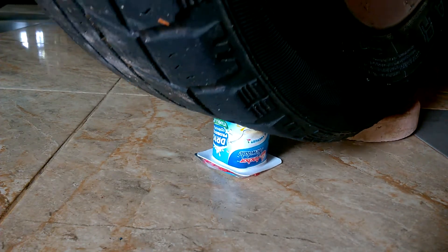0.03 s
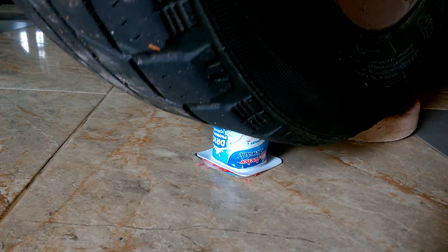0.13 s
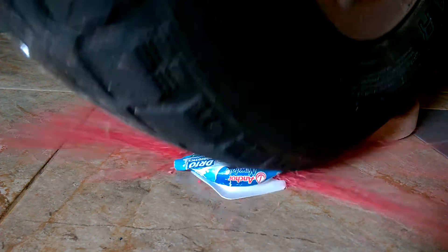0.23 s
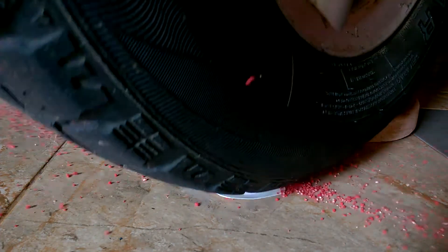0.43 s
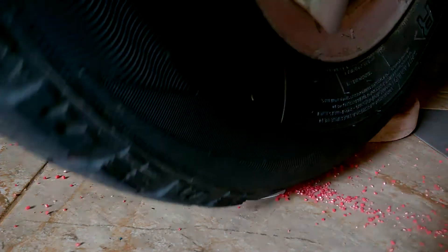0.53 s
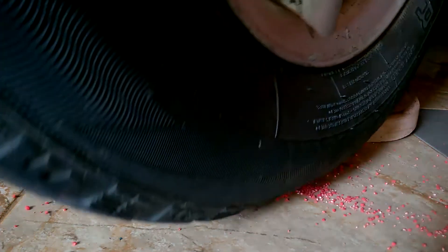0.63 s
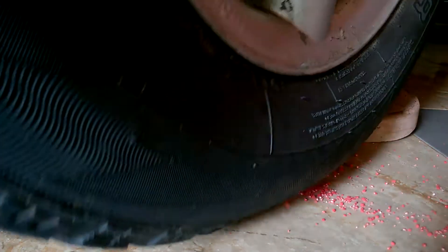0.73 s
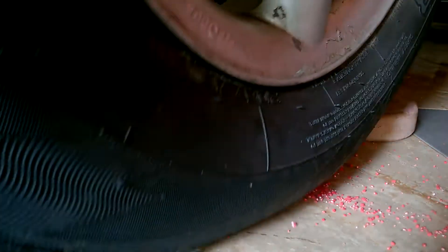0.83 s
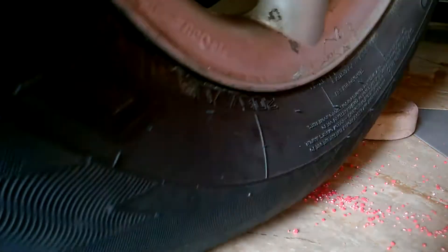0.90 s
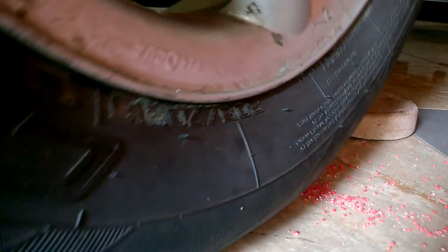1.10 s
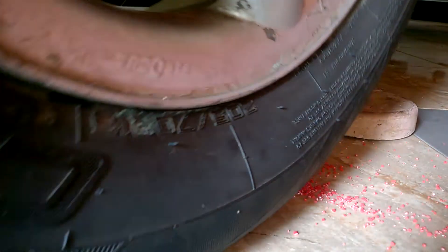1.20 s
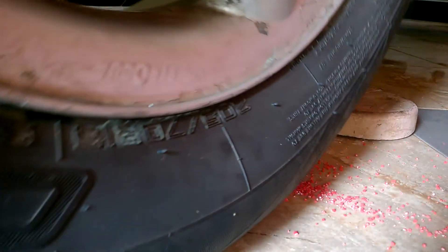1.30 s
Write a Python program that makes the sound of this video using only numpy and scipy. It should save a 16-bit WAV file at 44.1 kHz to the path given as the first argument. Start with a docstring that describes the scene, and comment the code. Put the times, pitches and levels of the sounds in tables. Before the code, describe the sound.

Close up in a hard tiled room, a slowly rolling tyre bursts a sealed cup with a sudden boomy pop, followed by brittle plastic crackling, brief rubber squeaks, a late hollow knock and sparse ticks over low rumble.

```python
"""A sealed plastic cup bursts on a tiled floor in a hard room under a slowly rolling car tyre.
The pop is struck modes with a booming noise tail, and the flattened plastic snaps through resonances
and buckles in low tones with room echoes. The tyre hums, rumbles and squeaks in tones and narrow noise,
granules hiss over the tiles as random clicks, and a late knock rattles and sets some metal ringing."""
import sys
import numpy as np
from scipy import signal
from scipy.fft import rfft, irfft
from scipy.io import wavfile
from scipy.ndimage import uniform_filter1d

SR = 44100
rng = np.random.default_rng(int(sys.argv[2]) if len(sys.argv) > 2 else 0)


def generate_wav(sig):
    """Save sig (samples, or channels by samples) to the path in sys.argv[1] as 16-bit PCM at SR."""
    pcm = np.round(np.clip(np.atleast_2d(sig).T, -1, 1) * 32767).astype(np.int16)
    wavfile.write(sys.argv[1], SR, pcm)


N = 59535
T = np.arange(N) / SR  # s
POP_S = 0.2052  # moment the cup bursts

# bright colour of granules on tile, also of the snaps' ticks: f/Hz, relative level/dB
HISS_COLOUR = [(5500, -10), (7000, -1), (9500, -2), (11800, 0), (14000, -3), (15700, -6), (16200, -12)]


def amp(db):
    """Decibels to amplitude."""
    return 10 ** (np.asarray(db) / 20)


def level(curve):
    """Amplitude over the whole scene from breakpoints of t/s, level/dB."""
    return amp(np.interp(T, *np.transpose(curve)))


def evened(x):
    """Scales x to rms 1."""
    return x / np.sqrt(np.mean(x ** 2) + 1e-20)


def read(points, hz):
    """Reads a curve over frequency, interpolating along log frequency."""
    f, value = np.transpose(points)
    return np.interp(np.log(hz + 1), np.log(f + 1), value)


def coloured(x, colour):
    """Filters x to a spectrum, silent outside its end points, at rms 1."""
    hz = np.fft.rfftfreq(len(x), 1 / SR)
    inside = (hz >= colour[0][0]) & (hz <= colour[-1][0])
    spectrum = rfft(x) * amp(read(colour, hz)) * inside
    return evened(irfft(spectrum, len(x)))


def add(mix, s, sound):
    """Mixes a sound in at s seconds, cut at the end of the scene."""
    part = mix[round(s * SR):][:len(sound)]
    part += sound[:len(part)]


def resonate(x, hz, width):
    """A resonance of gain 1 that may glide: shift hz down to zero, smooth, shift back."""
    turn = np.exp(2j * np.pi * np.cumsum(hz * np.ones(len(x))) / SR)
    r = np.exp(-np.pi * width / SR)
    smooth = signal.lfilter([1 - r], [1, -r], x / turn)
    return 2 * (turn * smooth).real


def puff(noise, hz, width):
    """A burst through a steep double resonance, peak 1."""
    out = resonate(resonate(noise, hz, width), hz, width)
    return out / abs(out).max()


def ring(modes, t):
    """Dying sines struck at t = 0."""
    return sum(amp(db - 60 * t / t60) * np.sin(2 * np.pi * hz * t) for hz, db, t60 in modes)


def grains(per_s, spread_db):
    """Random clicks, a few of them large when spread_db is above 0."""
    clicks = rng.standard_normal(N) * (rng.random(N) < per_s / SR)
    return clicks * amp(spread_db * np.minimum(rng.exponential(1, N), 5))


def wavering_tone(hz, width, share):
    """A steady sine plus a share of narrow resonant noise that makes it waver, at rms 1."""
    waver = evened(resonate(rng.standard_normal(N), hz, width))
    return evened(np.sin(2 * np.pi * hz * T) + share * waver)


def tyre():
    """Low hum and rumble of the loaded tyre, thin rubber squeaks, and wavering rings after the pop."""
    # rolling rumble: t/s, level/dB
    rumble = [(0.0, -44.5), (0.164, -53), (0.206, -47), (0.304, -30), (0.45, -41), (0.68, -44.5),
              (1.35, -48.5)]
    # colour of the rumble: f/Hz, relative level/dB
    rumble_colour = [(18, 3.5), (26, 0.5), (33, -8), (45, -11), (97, -5.5), (160, -20.5)]
    # swells of the hum: t/s, level/dB
    hum = [(0.0, -50), (0.18, -56), (0.228, -37), (0.308, -33), (0.556, -44.5), (0.642, -33), (0.8, -38),
           (1.12, -42.5), (1.16, -52.5), (1.35, -49)]
    # rings after the pop: f/Hz, width/Hz, level/dB, t60/s, waver against the steady tone/ratio
    tyre_rings = [(225.1, 11.4, -30.5, 1.768, 0.136), (446, 10.9, -29, 0.82, 0.93)]
    # rubber squeaks: start/s, end/s, first f/Hz, last f/Hz, level/dB, roughness/0-1
    squeaks = [(0.013, 0.204, 3746, 3109, -57, 0.02), (0.175, 0.199, 2171, 2150, -50.5, 0),
               (0.536, 0.543, 1888, 1985, -24.5, 0.22), (0.548, 0.57, 1954, 1894, -38.5, 0.53),
               (0.627, 0.76, 4220, 4048, -44, 0.8), (0.757, 0.816, 2465, 2530, -48, 0.22)]

    out = level(rumble) * coloured(rng.standard_normal(N), rumble_colour)
    out += level(hum) * wavering_tone(62, width=5.36, share=0.356)
    for start, end, first_hz, last_hz, db, rough in squeaks:
        hz = np.linspace(first_hz, last_hz, round((end - start) * SR))
        whistle = np.sin(2 * np.pi * np.cumsum(hz) / SR)
        fuzz = evened(puff(rng.standard_normal(len(hz)), hz, width=170))
        tone = (1 - rough) * whistle + rough * fuzz
        add(out, start, amp(db) * signal.windows.tukey(len(hz), 0.3) * tone)
    for hz, width, db, t60, share in tyre_rings:
        add(out, POP_S, amp(db - 60 * T / t60) * wavering_tone(hz, width, share))
    return out


def scatter():
    """Dense small cracks of plastic, and granules skittering on tile, as coloured random clicks."""
    # small cracks: t/s, level/dB
    crackle = [(0.0, -57), (0.258, -67), (0.382, -35), (0.634, -43), (0.766, -46), (0.966, -51),
               (1.222, -48.5), (1.35, -55.5)]
    # colour of the cracks: f/Hz, relative level/dB
    crackle_colour = [(180, -12), (300, 11), (453, -6), (586, 1), (725, 4), (2080, 2), (2680, -0.5),
                      (4110, 2), (5320, -1), (9000, -25.5), (11700, -67), (19800, -120)]
    # granules on tile: t/s, level/dB
    hiss = [(0, -70), (.203, -80.5), (.207, -48), (.235, -40.5), (.3, -50), (.34, -59), (.43, -47),
            (.55, -55.5), (.6, -63.5), (.65, -65.5), (.68, -53), (.76, -62.5), (.79, -87), (1.35, -72.5)]

    cracks = coloured(grains(per_s=6000, spread_db=2.55), crackle_colour)
    granules = coloured(grains(per_s=15000, spread_db=2.94), HISS_COLOUR)
    return level(crackle) * cracks + level(hiss) * granules


def floor_noise():
    """Steady background noise under everything."""
    # colour of the background: f/Hz, relative level/dB
    floor_colour = [(71, -30.5), (120, 8), (200, 4.5), (314, -11.5), (362, -3.5), (805, -10), (1580, -26.5),
                    (2990, -14), (3450, -11.5), (3820, -24), (5410, -29), (16000, -61)]
    return amp(-49.5) * coloured(rng.standard_normal(N), floor_colour)


def snaps():
    """Each snap is a crack and some grit through two resonances, plus a treble tick on its own track."""
    # sharp snaps of plastic: t/s, main peak level/dB, f/Hz, upper ring level/dB, tick level/dB
    snap_table = [(0.0084, -48.5, 3790, -39.5, -69.5), (0.064, -41, 3620, -49.5, -90),
                  (0.0874, -58.5, 3240, -39, -66), (0.2864, -20, 3640, -38.5, -39.5),
                  (0.2974, -21.5, 3930, -38.5, -55), (0.3406, -27, 4000, -22.5, -52.5),
                  (0.3777, -20, 4050, -29, -49), (0.398, -19, 3650, -20.5, -68.5),
                  (0.4157, -23.5, 3960, -30, -63), (0.4246, -12.5, 4217, -23, -51.5),
                  (0.4299, -17, 4350, -45.5, -65.5), (0.4427, -13.5, 4190, -24.5, -58.5),
                  (.4465, -22.5, 3090, -21, -59.5), (0.455, -19.5, 3600, -23.5, -66),
                  (0.4645, -19.5, 3160, -26.5, -66), (0.4709, -20, 3880, -44, -60.5),
                  (0.4779, -22, 3110, -27, -65), (0.492, -23.5, 3560, -32, -69),
                  (0.502, -34.5, 4000, -26.5, -51.5), (0.5196, -28, 4000, -32, -58.5),
                  (0.5448, -27.5, 3930, -67, -54), (0.5555, -28.5, 4400, -34, -70.5),
                  (0.5924, -28.5, 3400, -25, -68.5), (0.6233, -26.5, 3310, -53.5, -82.5),
                  (0.644, -28.5, 4060, -27.5, -73.5), (0.6628, -31, 2203, -41, -79.5),
                  (0.675, -41, 4000, -29, -70.5), (0.6985, -20, 2630, -31.5, -79.5),
                  (0.6929, -30.5, 3500, -29.5, -79), (0.699, -16.5, 4324, -26, -72.5),
                  (0.7184, -30.5, 2100, -29, -61.5), (0.7491, -38, 4100, -33.5, -67.5),
                  (0.753, -30.5, 3940, -50, -81.5), (0.758, -54.5, 2460, -33.5, -76.5),
                  (0.8066, -31, 3950, -59.5, -73.5), (0.8323, -25.5, 3553, -62, -95.5),
                  (0.837, -21.5, 4140, -60.5, -95.5), (0.8862, -30.5, 3260, -65, -89.5),
                  (0.9568, -62.5, 3460, -40, -92), (1.027, -31.5, 2796, -65, -80),
                  (1.0444, -31.5, 3020, -43.5, -81.5), (1.1792, -37.5, 3200, -59.5, -85.5),
                  (1.1854, -39, 3560, -52, -87), (1.235, -27.5, 3650, -64.5, -90.5),
                  (1.3108, -37, 4730, -58, -85.5)]
    grit_t60, tick_t60, rise_s = 0.008, 0.005, 0.0001  # s
    upper_hz, q = 5300, 3.6
    crack_share = 4.03  # first crack against the grit behind it

    out, ticks, t = np.zeros(N), np.zeros(N), T[:800]
    rise = np.minimum(t / rise_s, 1)
    for s, db, hz, upper_db, tick_db in snap_table:
        grit = rng.standard_normal(len(t)) * rise * amp(-60 * t / grit_t60)
        burst = grit + crack_share * (t == 0)
        add(out, s, amp(db) * puff(burst, hz, hz / q))
        add(out, s, amp(upper_db) * puff(burst, upper_hz, upper_hz / q))
        treble = coloured(rng.standard_normal(len(t)), HISS_COLOUR)
        tick = evened(amp(-60 * t / tick_t60) * rise * treble)
        add(ticks, s, amp(tick_db) * tick)
    return out, ticks


def buckles():
    """The cup wall gives way dully: a low tone and an overtone swell and die within a few turns."""
    # dull buckles: t/s, level/dB, f/Hz, turns until the ring is largest
    buckle_table = [(0.063, -41, 590, 0.527), (0.398, -17, 1820, 0.565), (0.455, -19.5, 1495, 0.557),
                    (0.5906, -25.5, 597, 0.41), (0.643, -28, 1770, 0.93), (0.6631, -17.5, 908, 0.285),
                    (0.697, -19, 1095, 0.522), (.697, -27, 477, 0.995), (0.7171, -21.5, 1135, 0.98),
                    (0.751, -24, 1084, 0.32), (0.83, -3, 961, 0.543), (.833, -22, 300, 0.913),
                    (0.8345, -13.5, 1046, 1.564), (0.873, -14, 1107, 0.642), (.877, -24.5, 2150, 1.99),
                    (0.880, -15.5, 930, 0.515), (0.8855, -18.5, 962, 0.456), (.897, -23.5, 2133, 2.678),
                    (.916, -32.5, 517, 0.672), (1.043, -29, 1123, 0.6), (1.096, -30.5, 915, 0.505),
                    (1.184, -31, 1110, 0.52), (1.231, -23.5, 1050, 0.818)]
    lag_s, overtone_ratio, overtone_db = 0.001203, 2.396, -12

    out, t = np.zeros(N), T[:800]
    for s, db, hz, swell_turns in buckle_table:
        swell = hz * t / swell_turns  # reaches 1 when the ring is largest
        phase = 2 * np.pi * swell_turns * (swell - 1.2)
        overtone_level = amp(overtone_db) / max(swell_turns, 1) ** 2  # slow swells are purer
        shape = np.cos(phase) + overtone_level * np.cos(overtone_ratio * phase)
        envelope = (swell * np.exp(1 - swell)) ** 1.79
        add(out, s + lag_s, -amp(db) * envelope * shape)
    return out


def plastic():
    """The flattened plastic: a body of snaps and buckles under a steep low-pass at 6450 Hz, with bright ticks
    on top."""
    snap_body, ticks = snaps()
    dulling = signal.butter(8, 6450, fs=SR, output="sos")
    return signal.sosfilt(dulling, snap_body + buckles()) + ticks


def room(x):
    """Sparse echoes off tile and walls, as random clicks of either sign that die away."""
    t60, gap_s = 0.38, 0.004
    taps = np.sign(grains(per_s=2000, spread_db=0)) * amp(-60 * T / t60) * (T > gap_s)
    return signal.fftconvolve(x, taps / np.linalg.norm(taps))[:N]


def pop():
    """Pressure swells, the wall lets go into struck modes, and the burst dies away band by band."""
    # modes of the burst: f/Hz, relative level/dB, t60/s
    pop_modes = [(300, 2, 0.025), (488, 0, 0.0119), (1281, 2, 0.0195), (1770, -5.5, 0.0131),
                 (4000, -3, 0.0046)]
    # colour of the boom: f/Hz, relative level/dB
    boom_colour = [(24, -37), (60, -11), (150, -6), (250, -1.5), (350, -3), (470, -16), (620, -11),
                   (850, -23.5), (1250, -5.5), (1540, -15.5), (1760, -8.5), (2020, -23), (2650, -17),
                   (5110, -21), (9000, -48.5), (11700, -72)]
    # how long each band booms on: f/Hz, t60/s
    boom_t60 = [(60, 0.63), (150, 1.283), (300, 0.595), (700, 0.717), (1500, 0.538), (3000, 0.563),
                (6000, 0.707)]

    t = T - POP_S
    pressure = 0.334 * np.exp(np.minimum(t, 0) / 0.0007)  # swells e-fold every 0.7 ms
    release = -ring(pop_modes, np.maximum(t, 0))
    out = amp(-8.5) * np.where(t < 0, pressure, release)
    # high-pass near 100 Hz, like a microphone's bass roll-off, keeps the swell from thumping
    out = signal.sosfilt(signal.butter(2, 99.8, "high", fs=SR, output="sos"), out)

    noise = coloured(rng.standard_normal(N), boom_colour)
    hz, at, bands = signal.stft(noise, SR, nperseg=512)
    decay = amp(-60 * at / read(boom_t60, hz)[:, None])
    boom = signal.istft(bands * decay, SR, nperseg=512)[1][:N]
    rise = np.minimum(T / 0.00367, 1)
    add(out, POP_S, amp(-14.5) * boom * rise)
    return out


def knock():
    """A grainy rattle, and metal modes that ring unevenly at each jolt."""
    # colour of the rattle: f/Hz, relative level/dB
    rattle_colour = [(180, -30), (300, -1.5), (441, -22), (733, -0.5), (900, -6), (2110, -5), (2980, -12.5),
                     (4030, 0), (4620, -32.5), (5830, -50), (8000, -79.5), (10400, -87.5), (17600, -120)]
    # ringing metal: f/Hz, relative level/dB, t60/s
    metal_modes = [(764, -28.5, 0.212), (971, -41.5, 0.4), (1245.6, -22.5, 0.104), (3575, -31, 0.453),
                   (3960, -31, 0.172), (5737, -34.5, 0.108)]
    # jolts to the metal: t/s, relative level/dB
    metal_hits = [(.8365, -13.5), (.86, -8.5), (0.887, -20), (1.233, -21)]
    knock_s, knock_db, knock_t60 = 0.8325, -25, 0.4335  # s, dB, s

    out = np.zeros(N)
    rattle = coloured(grains(per_s=12000, spread_db=1.0), rattle_colour)
    rise = np.minimum(T / 0.001, 1) ** 2
    add(out, knock_s, amp(knock_db - 60 * T / knock_t60) * rise * rattle)
    for s, db in metal_hits:
        uneven = 1 + 0.5 * evened(uniform_filter1d(rng.standard_normal(N), 300))
        rise = np.minimum(T / 0.00495, 1)
        add(out, s, amp(db) * rise * ring(metal_modes, T) * uneven)
    return out


def scene():
    """All layers summed to one channel; only the plastic is sent to the room echoes."""
    near = plastic()
    echoes = amp(-10.5) * room(near)
    return (tyre() + scatter() + floor_noise() + near + echoes + pop() + knock())[None]


def record(dry):
    """The band limit of the recorder: a steep low-pass at 16150 Hz."""
    low_pass = signal.firwin(2047, 16150, window=("kaiser", 9), fs=SR)
    return signal.oaconvolve(dry, low_pass[None], "same")


dry = scene()
out = record(dry)
generate_wav(out)
```